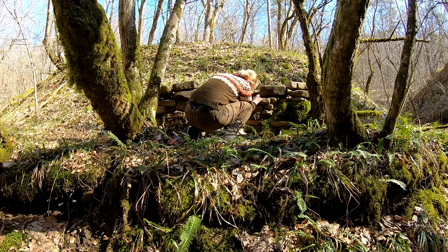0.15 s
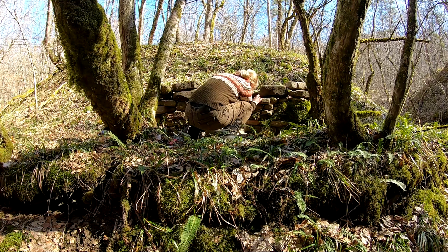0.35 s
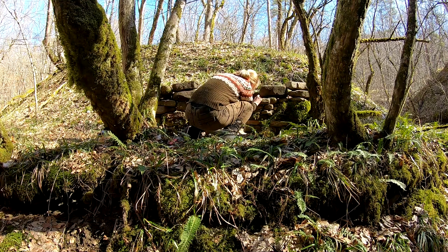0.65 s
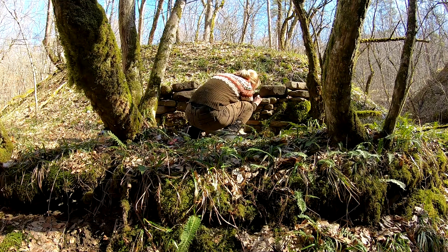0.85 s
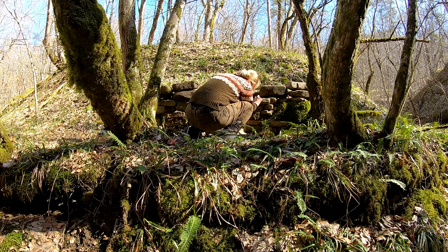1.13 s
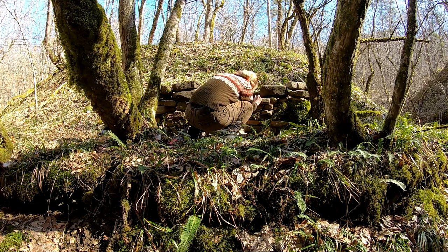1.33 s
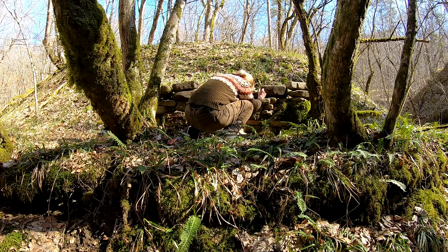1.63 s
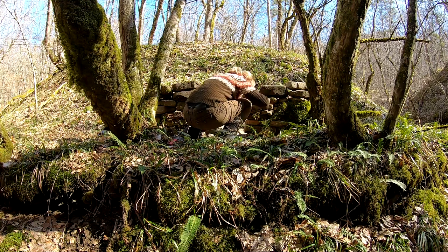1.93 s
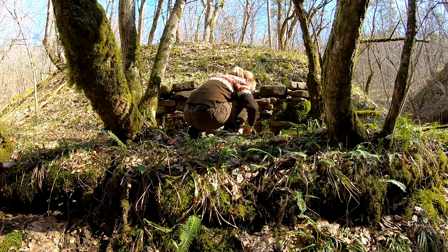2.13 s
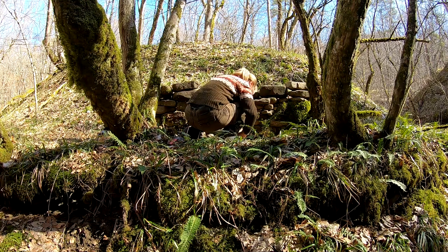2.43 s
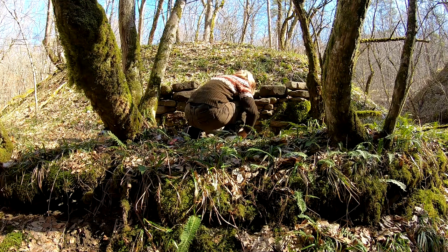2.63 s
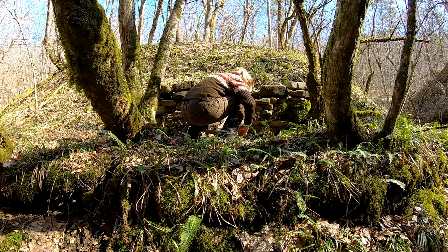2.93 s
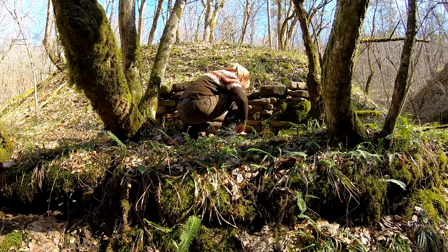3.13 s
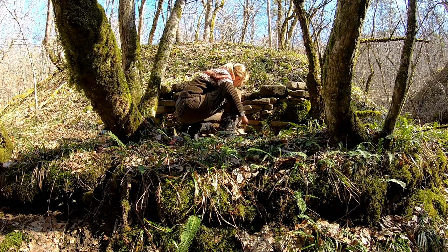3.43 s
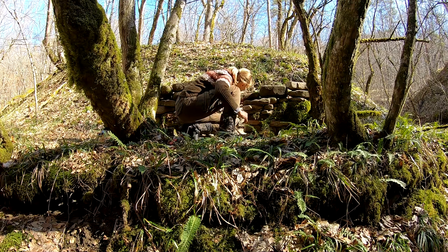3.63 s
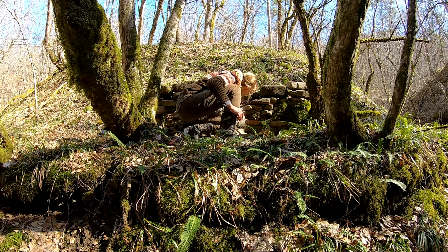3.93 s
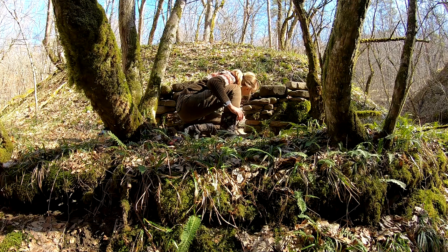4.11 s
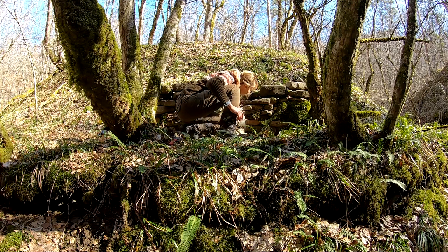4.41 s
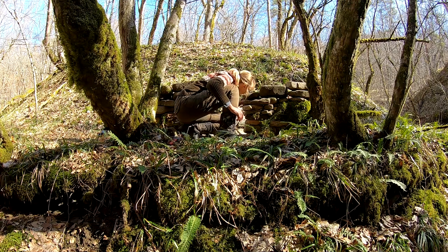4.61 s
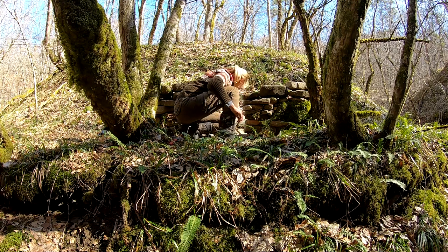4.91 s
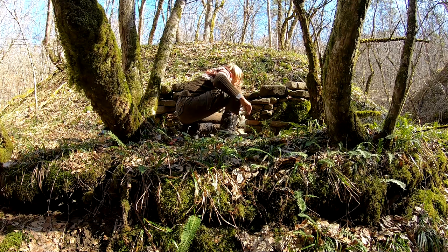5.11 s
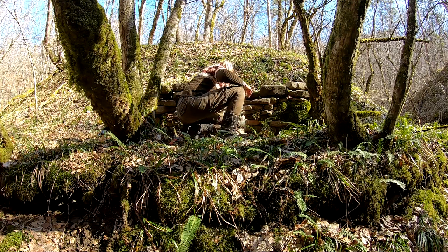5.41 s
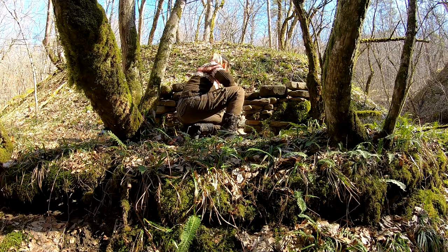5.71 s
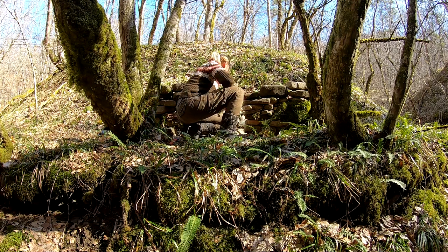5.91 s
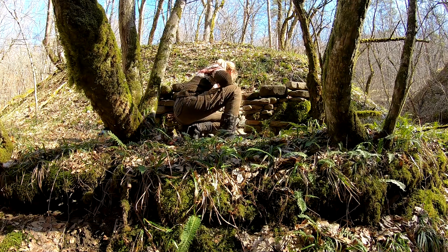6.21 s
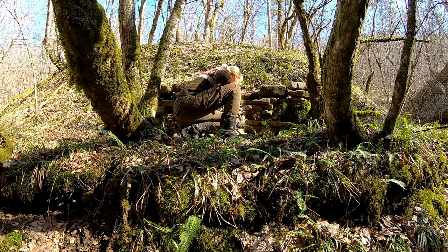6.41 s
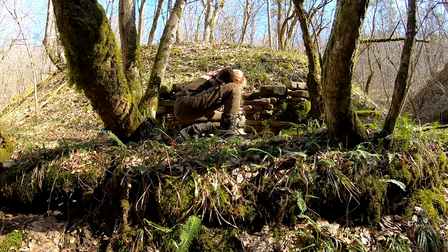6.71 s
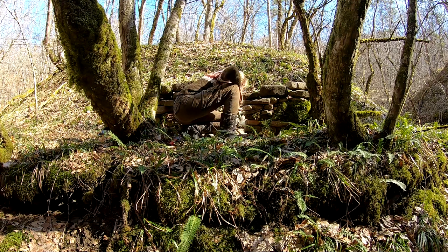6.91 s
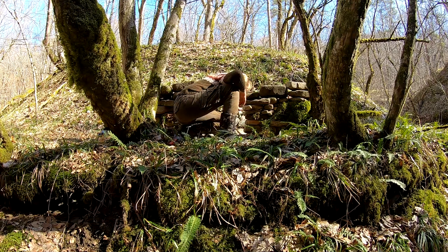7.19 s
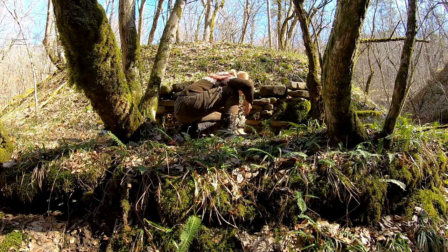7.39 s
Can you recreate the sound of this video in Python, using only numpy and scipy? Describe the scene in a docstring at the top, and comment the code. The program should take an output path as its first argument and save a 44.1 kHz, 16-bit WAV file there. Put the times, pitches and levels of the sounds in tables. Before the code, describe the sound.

Bright bubbling water drips steadily over a mossy bank while someone clicks stones together, rustles briefly, and gusts buffet the microphone.

```python
"""Forest spring with clicking stones

A spring trickles down a mossy bank: ringing bubbles plink in pools, and drops and droplets tick on leaves.
Someone clicks stones together (short chattering clicks) and shifts with a dry rustle and a dull scuff.
Shaped noise makes the wash and murmur of the stream, and gusts that buffet the two microphone ports.
A short forest echo follows the water and the stones."""
import sys
import numpy as np
from scipy import signal
from scipy.io import wavfile
from scipy.ndimage import uniform_filter1d

SR = 44100
rng = np.random.default_rng(int(sys.argv[2]) if len(sys.argv) > 2 else 0)


def persist_wave(psi):
    """Save psi, clipped to +-1, as 16-bit WAV."""
    counts = np.round(np.clip(psi, -1, 1) * 32767).astype(np.int16)
    wavfile.write(sys.argv[1], SR, np.atleast_2d(counts).T)


N = 332955
TIME = np.arange(N) / SR  # s

# In every table, a positive left-right value means louder on the left.
# loudest single bubbles: t/s, f/Hz, level/dB, ring time/cycles, left-right/dB
BUBBLES = [(0.03, 3610, -36.5, 10, -1), (0.093, 2540, -41, 7.4, 3), (0.119, 4550, -38, 1.5, 3),
           (0.141, 2060, -42, 11, -2), (0.154, 1180, -41, 4.6, 12), (0.142, 4000, -45, 7, 0),
           (0.16, 3830, -43, 3, 0), (0.196, 1600, -45.5, 5, 0), (0.218, 698, -49.5, 18.4, -7),
           (0.236, 1090, -45, 5.2, -12), (0.277, 2280, -37, 3.3, 2), (0.323, 3420, -40, 5, -6),
           (0.334, 1137, -46, 7.3, -12), (0.431, 1360, -45.5, 7.4, 4), (0.444, 2520, -37.5, 3.3, -1),
           (0.47, 2110, -37.5, 3.3, -1), (0.467, 1010, -48.5, 13, -7), (0.47, 1220, -47.5, 9.9, 10),
           (0.502, 1800, -44, 4, -4), (0.59, 2440, -40, 4.5, -2), (0.604, 3150, -38, 6.8, -2),
           (0.632, 1080, -45.5, 7.6, -19), (0.655, 3720, -35, 5.4, -4), (0.727, 1210, -46, 8, -2),
           (0.745, 2120, -42, 4, -6), (0.763, 1084, -42, 5.7, -11), (0.784, 3780, -39.5, 5.7, 1),
           (0.955, 2880, -38.5, 5, -2), (1.038, 670, -48.5, 6.9, -3), (1.104, 2580, -44, 12, 1),
           (1.136, 1240, -47, 7, -11), (1.241, 2670, -41, 8, 1), (1.266, 1370, -47, 8.1, 0),
           (1.271, 3050, -41, 14, -1), (1.29, 620, -51, 12.5, 2), (1.342, 1253, -46, 10.5, -4),
           (1.364, 600, -46.5, 5, 0), (1.388, 684, -46, 5.1, 0), (1.389, 1250, -39, 4.9, -9),
           (1.461, 1860, -39.5, 2.7, -9), (1.477, 2870, -37, 1.7, -5), (1.484, 590, -47, 5.5, 0),
           (1.515, 600, -48, 4.3, -3), (1.575, 1120, -47, 8.5, 5), (1.641, 3980, -38, 2.7, -2),
           (1.663, 2210, -41.5, 7.1, 2), (1.723, 1175, -46.5, 16, 11), (1.73, 4200, -38, 5.3, 0),
           (1.733, 2360, -37.5, 2.7, -1), (1.786, 686, -47, 8.1, 6), (1.814, 2900, -44, 5.5, -3),
           (1.89, 497, -56.5, 13, -2), (1.978, 3800, -40.5, 3, -2), (2.069, 1080, -35, 3.7, -27),
           (2.068, 634, -50.5, 6, -2), (2.08, 1290, -44.5, 6, -8), (2.088, 1670, -43, 6, -1),
           (2.165, 3000, -40.5, 7.5, 2), (2.216, 1630, -45, 8, -3), (2.292, 2540, -41.5, 6.6, -7),
           (2.348, 1400, -50, 7, -2), (2.386, 1680, -47, 11, -3), (2.465, 3700, -40.5, 4, 2),
           (2.501, 1440, -46.5, 6, 10), (2.64, 2180, -46, 9, 0), (2.67, 2490, -45, 8.2, -7),
           (2.697, 1024, -46.5, 7.8, -9), (2.752, 940, -49.5, 5.8, -1), (2.775, 1726, -40.5, 8.4, 3),
           (2.791, 1220, -46, 6.5, -9), (2.918, 645, -45.5, 5, 4), (3.03, 2680, -41.5, 5, -1),
           (3.052, 1056, -42.5, 10.6, 6), (3.141, 1055, -45, 6.5, -9), (3.142, 658, -50.5, 5.7, -2),
           (3.172, 995, -46, 7, -7), (3.387, 1230, -48, 7, 7), (3.471, 1250, -46, 6.1, -4),
           (3.472, 593, -50.5, 5.2, 2), (3.5204, 1454, -33.5, 3.8, -15), (3.53, 4180, -36.5, 3.4, -1),
           (3.542, 3300, -41.5, 7, -2), (3.611, 4040, -37, 3.3, -2), (3.647, 2820, -33, 4, 3),
           (3.666, 3900, -34, 2.5, -2), (3.682, 3726, -38.5, 3, -3), (3.741, 1760, -46, 11, 7),
           (3.779, 770.4, -46, 5.8, -11), (3.831, 4030, -41, 2.7, 3), (3.87, 2900, -39, 3, 4),
           (3.877, 1222, -49, 18, 0), (4.025, 3350, -42, 6.2, 0), (4.196, 2170, -37, 1.4, -5),
           (4.215, 2200, -40.5, 3, 1), (4.381, 3400, -41.5, 2, -2), (4.639, 3940, -36, 1.8, -4),
           (4.647, 3370, -41, 6, -5), (4.716, 1296, -46, 9.9, -3), (4.748, 4060, -38.5, 2.2, 3),
           (4.778, 650, -46.5, 14.5, -1), (4.807, 1330, -48, 7, -4), (4.846, 2850, -38, 3, -3),
           (4.911, 2100, -41, 3, 3), (5.027, 1280, -48, 7, 13), (5.052, 2540, -38.5, 3.8, -3),
           (5.082, 2550, -34, 7, -1), (5.107, 1755, -42, 16, -2), (5.19, 630, -44.5, 7.4, 0),
           (5.19, 1800, -45, 3.5, -4), (5.241, 3030, -32, 11.4, 0), (5.272, 4100, -34.5, 8.4, 2),
           (5.353, 4150, -38, 3, -4), (5.368, 1800, -41, 6.2, -1), (5.454, 3230, -35.5, 1.6, -8),
           (5.49, 1424, -41.5, 6.5, 0), (5.532, 1110, -49, 7.9, -15), (5.552, 1104, -45.5, 19, 12),
           (5.591, 2020, -34.5, 3.1, -5), (5.656, 1040, -44, 8.5, -8), (5.695, 2330, -45, 10, -2),
           (5.746, 2850, -42.5, 4.8, 0), (5.822, 1260, -46, 10.5, -3), (5.879, 720, -50.5, 7.2, 3),
           (5.9, 2990, -36, 4.3, -1), (5.937, 1053, -43.5, 8.1, -10), (6.032, 3080, -39, 8.2, -1),
           (6.106, 1570, -36, 1.4, -21), (6.127, 2680, -39, 8.7, -1), (6.134, 1810, -43, 3.6, 0),
           (6.21, 1580, -46.5, 9.9, 5), (6.298, 1320, -42.5, 5.1, 6), (6.356, 3510, -44.5, 10, -7),
           (6.403, 1256, -45.5, 6, 9), (6.418, 1700, -41, 2.6, 4), (6.425, 798, -49, 3.5, 0),
           (6.578, 1380, -40.5, 8.3, 6), (6.704, 2160, -43, 8, -2), (6.742, 628, -50, 4.6, 1),
           (6.776, 1700, -47, 17, 14), (6.87, 985, -50, 23, 6), (7.076, 912, -45.5, 8, -9),
           (7.264, 887, -45.5, 4.2, -1), (7.11, 3670, -36, 3.8, -12), (7.138, 2380, -45, 5, -6),
           (7.191, 744, -47, 2.5, 0), (7.175, 3220, -36.5, 5.4, 0), (7.276, 2570, -41, 8.5, -3),
           (7.377, 1950, -43.5, 9.5, 3), (7.426, 3920, -35, 3.3, -1), (7.485, 2110, -40, 5, 8),
           (7.52, 655, -50, 7, 0), (7.522, 1250, -47, 7, -4)]
# pools that keep releasing fainter bubbles:
# f/Hz, pitch spread/octaves, rate/(1/s), level/dB, ring time/cycles, left-right spread/dB
POOLS = [(640, 0.09, 11, -59.5, 6, -2.5), (1100, 0.3, 16, -57, 8.5, 7), (2200, 0.35, 22, -52.5, 7, 6),
         (3980, 0.2, 12, -50, 4.5, -0.5), (7200, 0.2, 12, -53, 7, 5)]
# loudest gulps, where tumbling water frees a knot of bubbles:
# t/s, length/s, centre f/Hz, level/dB (before a common lift)
GULPS = [(0.136, 0.029, 1600, -56.5), (0.26, 0.021, 1950, -53.5), (0.603, 0.029, 1490, -61),
         (0.726, 0.064, 1105, -61), (1.265, 0.076, 1450, -63), (1.454, 0.071, 1390, -58.5),
         (1.746, 0.076, 1480, -61), (1.769, 0.064, 925, -62), (1.862, 0.048, 3050, -60),
         (2.699, 0.083, 1180, -63.5), (3.053, .025, 1540, -53.5), (3.519, 0.0095, 1660, -56),
         (3.606, 0.025, 3700, -54.5), (4.79, 0.024, 985, -57), (4.87, 0.035, 1520, -54),
         (4.943, 0.022, 910, -58), (5.471, 0.032, 1510, -61.5), (5.56, 0.027, 1386, -54),
         (6.003, .02, 1700, -54.5), (6.348, 0.012, 2410, -57), (6.424, 0.013, 1060, -57.5),
         (6.705, .008, 2510, -51.5), (6.74, 0.054, 1250, -61.5), (7.17, 0.0069, 1930, -50.5),
         (7.183, 0.023, 2410, -52), (7.382, 0.034, 1990, -57.5), (7.48, 0.025, 1390, -57)]
# strength of the small bubbles by pitch: f/Hz, level/dB
FIZZ = [(520, -13.5), (650, -7.5), (850, -10.5), (1250, 1), (2000, 4.5), (3200, 6.5), (4300, 0.5),
        (5500, 3), (8300, 9.5), (9600, -3)]
# treble roll-off of the microphone, used on the small bubbles: f/Hz, level/dB
MIC_TOP = [(100, -1.5), (8800, 3), (10000, -0.5), (11200, -11), (15500, -31)]
# how far the flow lies above its usual level: t/s, level/dB
FLOW = [(0, 2), (0.25, 1), (0.72, 0), (1.02, 0), (1.4, 1), (1.8, 2.5), (2.35, 0), (2.85, 1), (3.4, 2),
        (3.78, 3), (4.05, 0), (4.55, 1), (4.8, 2), (5.1, 0.5), (5.75, 0), (6.05, 1), (6.5, 0), (7.55, 2)]
# how far the fine spray lies above its usual level: t/s, level/dB
SPRAY = [(0, -1.5), (0.72, -0.5), (0.95, -3.5), (1.8, 1.5), (2.15, 0), (2.39, -4), (2.55, 4), (2.73, -3),
         (3.1, 4), (3.65, 1.5), (4.35, -1), (4.7, 4), (5.05, -0.5), (5.45, 0.5), (6.13, -2.5), (6.3, -4.5),
         (6.55, -0.5), (7.55, 1)]
# loudest drops on wet stone and leaves: t/s, level/dB, left-right/dB, ring of the struck spot f/Hz
DROPS = [(0.008, -40, -2, 4700), (0.1885, -41, -10, 8100), (0.269, -34, 1, 7900), (0.324, -38.5, -1, 4130),
         (0.502, -39, -6, 4300), (0.556, -39, -9, 8060), (0.695, -38.5, -3, 6300),
         (0.8117, -38.5, -5, 6100), (1.155, -41.5, 1, 4820), (1.241, -42, 0, 8060), (1.325, -41, -2, 6950),
         (1.756, -37, 0, 8880), (2.509, -32.5, -14, 4700), (2.647, -44, -5, 4720), (2.844, -36, -1, 5200),
         (3.005, -42, 6, 5760), (3.06, -40, -5, 7350), (3.2166, -32, -0.5, 6400), (3.272, -37, 0, 2900),
         (4.04, -38.5, -1, 8560), (4.095, -39, 2, 4700), (4.329, -40.5, -5, 8600), (4.521, -36, -1, 4590),
         (4.681, -40, -2, 4510), (4.777, -36.5, -8, 8240), (4.956, -35.5, -4, 6650),
         (5.018, -37.5, -5, 7860), (5.072, -39, 0, 6780), (5.195, -41, -7, 8300), (5.722, -36, -9, 8640),
         (5.899, -38, -4, 6840), (6.105, -34.5, -6, 5200), (6.139, -37, -6, 4000), (6.354, -43, -7, 3700),
         (6.4765, -32, -7, 8340), (6.631, -42, -7, 8910), (6.877, -37, -3, 5600), (7.215, -36.5, -8, 8460),
         (7.249, -39, -4, 6510), (7.2715, -37.5, -8, 8000), (7.35, -34.5, -1, 5100)]
# spectrum of a smacking drop: f/Hz, level/dB
SMACK = [(400, -19.5), (1500, -9), (4000, -1), (6000, -3.5), (8300, 0), (9800, -8), (11200, -26),
         (15000, -29)]
# spectrum of a droplet on a leaf: f/Hz, level/dB
TICK = [(700, -24), (2000, -6), (4200, -0.5), (6000, -1), (8500, -1.5), (9800, -9), (11200, -23),
        (15000, -38)]
# stone knocking on stone, first contact: t/s, level/dB
KNOCKS = [(2.1992, -19.5), (3.647, -33.5), (3.8698, -29), (3.909, -32.5)]
# spectrum of a stone click: f/Hz, level/dB
STONE = [(300, -43), (1400, -4), (2700, -6), (4200, 12.5), (6500, 11), (9000, 8.5), (11000, -20),
         (15000, -23)]
# clothes and dry leaves sliding as the person shifts: t/s, length/s, level/dB
SLIDES = [(3.198, 0.062, -49.5), (3.311, 0.032, -50), (3.388, 0.022, -55.5), (3.1, 0.035, -65)]
# spectrum of the rustle: f/Hz, level/dB
RUSTLE = [(100, -41), (200, -3), (450, -9.5), (700, -3), (1500, 1.5), (3000, 2), (5000, -1.5), (8500, -4),
          (11000, -14), (15000, -23)]
# spectrum of the scuff on the soil: f/Hz, level/dB
SOIL = [(70, -24), (170, 5), (290, -10), (450, -15.5), (900, -6), (2500, -56)]
# spectrum of the stream's wash: f/Hz, level/dB
WASH = [(220, -73), (380, -11), (518, -34), (644, 4.5), (906, -4), (1240, -0.5), (2190, -2), (2950, -5.5),
        (3180, -4), (5400, -13), (8730, -9), (9580, -14), (11200, -27.5), (12300, -29), (15500, -45)]
# spectrum of the stream's low murmur: f/Hz, level/dB
MURMUR = [(20, -22), (85, -9), (120, -22), (155, 3.5), (200, -2), (250, -7.5), (400, -14), (600, -14.5),
          (1200, -62)]
# left-right likeness of the wash and murmur: f/Hz, coherence/1
LIKENESS = [(60, -0.74), (200, -0.34), (640, -0.2), (1400, 0.046), (3000, 0.96), (4500, 0.84),
            (7000, -0.53), (15000, -0.093)]
# gusts on the microphone: t/s, length/s, level/dB, left-right/dB
GUSTS = [(0.565, 0.081, -41, 0), (1.733, 0.091, -45.5, -6), (3.977, 0.033, -41, -10),
         (4.156, 0.023, -38, 13), (4.271, 0.033, -45, -16), (4.849, 0.081, -28.5, -3.5),
         (5.006, 0.1, -30.5, 2.5), (5.259, 0.11, -35.5, 5.5), (5.454, 0.054, -30.5, 1),
         (5.684, 0.13, -39, -6.5), (5.892, 0.03, -31, 8), (6.044, 0.13, -32, -2.5), (6.3, 0.084, -32, 5),
         (6.55, 0.12, -45.5, 1), (6.8, 0.081, -48, -8), (7.112, 0.27, -38, 5.5), (7.546, 0.039, -37, 17)]
# the breeze between gusts: t/s, level/dB
BREEZE = [(0, -65), (0.3, -69), (0.62, -53), (0.9, -68), (1.5, -68), (1.9, -55.5), (2.4, -71), (3.8, -76),
          (4.25, -52), (4.6, -64.5), (5.1, -51.5), (7.55, -52)]
# sharp wind thumps, mostly stronger on one port: t/s, level/dB, f/Hz, left-right/dB
BUFFETS = [(1.755, -51, 67.5, -10), (4.899, -29, 55, -16), (4.911, -52, 132, -10), (5.074, -53, 104, 7),
           (5.501, -43.5, 71, -5), (5.802, -29, 104, 31), (5.817, -31, 62, 22), (6.081, -40.5, 71, -5),
           (6.361, -33, 60, 16), (7.329, -25.5, 46.3, 33)]

POOL_SPREAD_DB, POOL_SIDE_DB = 1.5, 1
POOL_FLOW_SHARE = 1.03  # share of the flow's swell that the pools follow
BUBBLE_RISE = 0.015  # average bend; the pitch gains twice this share in one ring time
SLOSH_S, SLOSH_DB, SPRAY_SLOSH_DB = 0.06, 0.56, 0.4  # parts of the trickle also swell on their own
GLUGS_PER_S, GLUG_S, GLUG_DB = 6.5, 0.016, 2  # pace, time to sink back, lift over the water between glugs
DRIPS_PER_S, DRIP_DB, DRIP_SPREAD_DB, DRIP_SIDE_DB = 4, -45.5, 1.8, -4
DROP_RING_DB, RING_OCTAVES = 9.5, 0.2  # how far a struck spot's ring stands out; width of drop and leaf rings
TICKS_PER_S, TICK_SPREAD_DB, TICK_SIDE_DB = 70, 3.5, -4
TICK_DB, TICK_SPRAY_SHARE, TICK_CLUMP_DB = -67.3, 1.2, 3
LEAF_HZ, LEAF_RING_DB = (2300, 9000), 11.5  # range of leaf pitches, and how far their rings stand out
REBOUND_S, REBOUND_DB = 0.0021, -8  # time between stone contacts; drop from the first to the second
SLIDE_ATTACK_S, SLIDE_RELEASE_S = 0.037, 0.027
CRACKLES_PER_S, CRACKLE_DB, CRACKLE_SPREAD_DB = 1400, -5, 2.2
SCRATCH_DB = 1.1  # how unevenly the cloth catches
SCUFF_S, SCUFF_LENGTH_S, SCUFF_DB = 7.175, 0.028, -53.5
MURMUR_DB = -65.5
GUST_ATTACK_S, GUST_RELEASE_S = 0.016, 0.028
SMALL_EDDY_DB, STRONG_GUST_DB = -46.5, -29  # level of small eddies in a gust of this strength
SMALL_EDDY_GROWTH = 4  # dB that small eddies gain per dB of gust
FOREST_T60 = 0.15  # s for the echo to fall by 60 dB
EDGE_HZ = 15600


def plinks():
    """Loud single bubbles, and the fainter ones that every pool releases around its own pitch."""
    out = np.zeros((2, N))
    for s, *row in BUBBLES:
        add(out, s, plink(*row))
    for hz, octaves, per_s, db, cycles, side_db in POOLS:
        times = loose_times(per_s, size=250)
        chances = np.clip(rng.standard_normal((len(times), 4)), -2, 2)
        for s, (pitch, strength, ring, side) in zip(times, chances):
            bubble_hz = hz * 2 ** (octaves * pitch)
            level_db = db + POOL_SPREAD_DB * strength + POOL_FLOW_SHARE * curve(FLOW, s)
            bubble_side_db = POOL_SIDE_DB + side_db * side
            add(out, s, plink(bubble_hz, level_db, cycles * np.exp(0.43 * ring), bubble_side_db))
    return out


def plink(hz, db, cycles, side):
    """One clear bubble with its own glide and its own reflections from the hollow it sits in."""
    path = amp(-9.5) * scatter(decay=0.0068)
    path[:, :1] += panned(side)
    ringing_bubble = bubble(hz, cycles, rise=BUBBLE_RISE * 2 * rng.random())
    return amp(db) * signal.fftconvolve(ringing_bubble[None], path, axes=1)


def bubble(hz, cycles, rise=.015, onset_cycles=2.0):
    """A trapped bubble rings down; its pitch rises as it nears the surface."""
    ring = cycles / hz
    t = np.arange(0, 6 * ring, 1 / SR)
    shape = np.exp(-t / ring) * (1 - np.exp(-t * hz / onset_cycles))
    return shape / shape.max() * np.sin(2 * np.pi * hz * (t + rise * t * t / ring))


def gulps(count=14):
    """Each tumble of water frees a quick run of damped bubbles around one pitch."""
    out = np.zeros((2, N))
    for s, length, hz, db in GULPS:
        knot = np.zeros((2, SR // 5))
        chances = rng.uniform(-0.997, 1, (count, 4))
        for k, (delay, octaves, size_db, side) in enumerate(chances):
            sound = bubble(hz * 2 ** (0.785 * octaves), 4.9, rise=0.038, onset_cycles=0.55)
            start = length * (k + .5 * delay + .5) / count
            add(knot, start, amp(5.5 * size_db) * panned(6 * side) * sound)
        loudness = np.sqrt(np.sum(knot ** 2) / (2 * length * SR))
        add(out, s, amp(db + 3.5) * knot / loudness)
    return out


def babble():
    """Middling bubbles, a crowd of them, in the pools straight ahead."""
    return amp(-58) * swarm(572.0, 4800, 3000, spread_db=11.0, cycles=7.16, side_db=0.5, echo_db=-4.5)


def spray():
    """Fine droplets and the tiniest bubbles tick as short rings, mostly to the right."""
    swell_db = 1.2 * curve(SPRAY, TIME) + SPRAY_SLOSH_DB * slosh(TIME)
    crowd = swarm(4980, 8900, 2400, spread_db=14.5, cycles=2.7, side_db=-8.0, echo_db=0.0)
    return amp(-67.0 + swell_db) * crowd


def swarm(low_hz, high_hz, total, spread_db, cycles, side_db, echo_db, count=120):
    """Crowds of small bubbles of many sizes burst in clumps at many spots along the trickle."""
    out, pitches = np.zeros((2, N)), np.geomspace(low_hz, high_hz, count)
    slow = np.arange(0, N / SR, .005)
    clumps = unit(uniform_filter1d(rng.standard_normal(len(slow)), size=5))
    for hz, flow_db in zip(pitches, surge(slow, pitches).T):
        level_db = read(FIZZ, hz) + flow_db + 2.34 * clumps
        for place, strength, ring, side, detune in rng.random((total // count, 5)):
            s = place * N / SR
            db = np.interp(s, slow, level_db) + spread_db * strength ** 2
            bubble_hz = hz * (0.9584 + 0.037 * detune)
            sound = bubble(bubble_hz, cycles * (0.23 + ring ** 2), rise=0.035, onset_cycles=0.55)
            add(out, s, amp(db) * panned(side_db + 13 * (side - .5)) * sound)
    echo = signal.oaconvolve(out, scatter(decay=0.007), axes=1)[:, :N]
    return unit(colour(out + amp(echo_db) * echo, MIC_TOP))


def surge(t, hz):
    """Swell in dB by time and pitch: low and middle pitches follow the flow, the treble the spray."""
    swing = np.array([curve(rows, t) + SLOSH_DB * slosh(t) for rows in (FLOW, FLOW, SPRAY)])
    centres = np.log([900, 2700, 7000])  # Hz, gurgle, splash and treble
    shares = np.array([np.interp(np.log(hz + 1), centres, row) for row in np.eye(3)])
    return swing.T @ shares


def slosh(t):
    """A slow random swing at the times t, drawn from steps of rms 1 joined by straight lines."""
    steps = rng.standard_normal(200)
    return np.interp(t / SLOSH_S, np.arange(len(steps)), steps)


def glugs():
    """The fall gathers and lets go: a gain of rms 1 that jumps with every glug and sinks back."""
    starts = loose_times(GLUGS_PER_S, size=70) - 1 / GLUGS_PER_S
    since = TIME - starts[np.searchsorted(starts, TIME) - 1]
    return unit(amp(GLUG_DB * np.exp(-since / GLUG_S)))


def loose_times(per_s, size=80):
    """Water gathers and lets go at a loose pace: one random moment in every period."""
    return (np.arange(size) + rng.random(size)) / per_s


def drips():
    """Single drops smack close by, each with the ring of the spot it hits, with lighter ones added."""
    out, times = np.zeros((2, N)), loose_times(DRIPS_PER_S, size=40)
    light = []
    for s, (strength, side, pitch) in zip(times, rng.standard_normal((len(times), 3))):
        db = DRIP_DB + DRIP_SPREAD_DB * strength
        light.append((s, db, DRIP_SIDE_DB + 4 * side, 4800 * 2 ** (.5 * pitch)))
    for s, db, side, hz in DROPS + light:
        spot = ringing(SMACK, hz, DROP_RING_DB, RING_OCTAVES)
        add(out, s, impact(db, side, spot, splash_db=6, decay=0.0024))
    return out


def ticks(count=12):
    """Pinpoint droplets land in clumps on leaves, each a dry tick with the ring of its leaf."""
    out, clumps = np.zeros((2, N)), amp(TICK_CLUMP_DB * slosh(TIME))
    for hz in np.geomspace(*LEAF_HZ, count):
        leaf = ringing(TICK, hz, LEAF_RING_DB, RING_OCTAVES)
        tick = impact(0, 0, leaf, splash_db=2.0, decay=0.0014)
        for place, size, side in rng.random((round(TICKS_PER_S * N / SR / count), 3)):
            db = TICK_SPREAD_DB * min(-np.log(size), 4)  # many small, a few large
            add(out, place * N / SR, amp(db) * panned(TICK_SIDE_DB + 14 * (side - .5)) * tick)
    return amp(TICK_DB + TICK_SPRAY_SHARE * curve(SPRAY, TIME)) * unit(out * clumps)


def ringing(spectrum, hz, ring_db, octaves):
    """A spectrum table with one resonance raised out of it."""
    f = np.geomspace(200, 16000, 120)
    peak = np.exp(-(np.log2(f / hz) / octaves) ** 2)
    return np.transpose([f, read(spectrum, f) + ring_db * peak])


def impact(db, side, spectrum, splash_db, decay):
    """A sharp click together with a short burst of fragments and reflections."""
    hit = amp(splash_db) * scatter(decay)
    hit[:, :1] += 1
    hit = colour(hit, spectrum)
    return amp(db) * panned(side) * hit / abs(hit).max()


def stones(count=4):
    """Dry clicks of stone that hardly ring but chatter as they settle, each contact weaker."""
    out = np.zeros((2, N))
    for s, db in KNOCKS:
        for k in range(count):
            contact_db = db + REBOUND_DB * k ** 0.47
            add(out, s + k * REBOUND_S, impact(contact_db, 0, STONE, splash_db=-0.3, decay=0.0069))
    return out


def rustle():
    """Slides of cloth that catch and slip, with dry leaves crackling in them."""
    likeness = [(300, 0.39), (1400, 0.54), (3000, 1.0), (7000, 0.63)]  # f/Hz, coherence/1
    cloth = noise(RUSTLE, likeness, patchy_db=-0.5, flicker_db=-0.6)
    snaps = unit(colour(clicks(CRACKLES_PER_S, CRACKLE_SPREAD_DB, 0), RUSTLE))
    catching = amp(SCRATCH_DB * unit(uniform_filter1d(rng.standard_normal(N), size=200)))
    grain = cloth * catching + amp(CRACKLE_DB) * snaps
    slides = [amp(db) * swell(s, length, SLIDE_ATTACK_S, SLIDE_RELEASE_S) for s, length, db in SLIDES]
    return grain * sum(slides)


def clicks(per_s, spread_db, side_db):
    """Random stereo impulses: many small ones, a few large."""
    happens = rng.random(N) < per_s / SR
    sizes = amp(spread_db * np.minimum(rng.exponential(1, N), 4)) * happens
    return sizes * rng.choice([-1, 1], N) * panned(side_db + 4 * rng.standard_normal(N))


def scuff():
    """Something heavy drags briefly over the soil, as a short swell of dull noise."""
    rasp = unit(colour(rng.standard_normal((2, N)), SOIL))
    return amp(SCUFF_DB) * rasp * swell(SCUFF_S, SCUFF_LENGTH_S, attack=0.013, release=0.058)


def wash(pulse):
    """The many blurred splashes of the stream, as noise that swells with flow, spray and glugs."""
    return amp(-55.0) * pulse * noise(WASH, LIKENESS, patchy_db=3.5, flicker_db=1.7, level=surge)


def murmur():
    """The low voice of the stream, as noise that follows half of the flow's swell in dB."""
    deep = noise(MURMUR, LIKENESS, patchy_db=2.0, flicker_db=1.5, size=2048)
    return amp(MURMUR_DB + .5 * curve(FLOW, TIME)) * deep


def wind():
    """Eddies thump each port almost separately; small, quick ones grow faster with the gust than large."""
    gusts = [amp(db) * panned(side) * swell(s, length, GUST_ATTACK_S, GUST_RELEASE_S)
             for s, length, db, side in GUSTS]
    power = amp(curve(BREEZE, TIME)) ** 2 + sum(gust ** 2 for gust in gusts)
    gust_db = 10 * np.log10(power)
    apart = [(20, -0.024), (200, 0)]  # f/Hz, coherence/1
    # eddy spectra: f/Hz, level/dB
    large_spectrum = [(8, -20.0), (22, 10.0), (42, 0.0), (60, -25.0), (90, -30), (200, -61), (1500, -120)]
    small_spectrum = [(20, -13), (60, -3.0), (100, -14), (160, -29), (260, -53), (1500, -110)]
    large = noise(large_spectrum, apart, patchy_db=1.5, flicker_db=-2.0, size=2048)
    # even out the large eddies so that the gust sets their strength
    large = large / np.sqrt(uniform_filter1d(large ** 2, size=3000, axis=1) + 0.033)
    small = noise(small_spectrum, apart, patchy_db=1.5, flicker_db=-3.0, size=2048)
    small_db = SMALL_EDDY_DB + SMALL_EDDY_GROWTH * (gust_db - STRONG_GUST_DB)
    out = large * amp(gust_db - 4.5) + small * amp(small_db)
    t = np.arange(-.06, .06, 1 / SR)
    for s, db, hz, side in BUFFETS:
        thump = np.exp(-(t * hz / 0.44) ** 2) * np.sin(2 * np.pi * hz * t)
        add(out, s + t[0], amp(db) * panned(side) * thump)
    return out


def forest(x, size=13000):
    """A thin, short echo from trunks and slope, made of sparse random reflections."""
    t = np.arange(size) / SR
    sparse = rng.standard_normal((2, size)) * (rng.random((2, size)) < .05)
    taps = sparse * amp(-60 * t / FOREST_T60) * (t > .006)
    return signal.oaconvolve(x, taps / np.linalg.norm(taps, axis=1, keepdims=True), axes=1)[:, :N]


def scatter(decay, size=1500):
    """Dense early reflections off the bank, different at each port, of unit energy."""
    t = np.arange(size) / SR
    taps = rng.standard_normal((2, size)) * np.exp(-t / decay) * (t > .0008)
    return taps / np.linalg.norm(taps, axis=1, keepdims=True)


def noise(points, likeness, patchy_db, flicker_db, level=None, size=512):
    """Stereo noise with a spectrum, drifting patches, shared flicker and an optional level field."""
    hop = size // 4
    t, hz = np.arange(N // hop + 5) * hop / SR, np.fft.rfftfreq(size, 1 / SR)
    a, b, c, d, patches = rng.standard_normal((5, len(t), len(hz)))
    patches = unit(uniform_filter1d(uniform_filter1d(patches, size=6, axis=0), size=7, axis=1))
    flicker = unit(uniform_filter1d(rng.standard_normal(len(t)), size=4))[:, None]
    same, left = np.clip(read(likeness, hz), -1, 1), a + 1j * b
    right = same * left + np.sqrt(1 - same ** 2) * (c + 1j * d)
    level_db = read(points, hz) + patchy_db * patches + flicker_db * flicker
    if level:
        level_db = level_db + level(t, hz)
    z = np.array([left, right]) * amp(level_db)
    sound = signal.istft(z, nperseg=size, noverlap=size - hop, time_axis=1, freq_axis=2)[1]
    return unit(sound[:, :N])


def colour(x, points, size=1024):
    """Causal filter of unit energy with the given spectrum."""
    log_gain = np.log(amp(read(points, abs(np.fft.fftfreq(size, 1 / SR)))))
    # the Hilbert transform gives the phase that puts the energy first
    taps = np.fft.ifft(np.exp(np.conj(signal.hilbert(log_gain)))).real
    return signal.oaconvolve(x, taps[None] / np.linalg.norm(taps), axes=1)[:, :x.shape[1]]


def swell(start, length, attack, release):
    """An envelope that grows into its start, holds for its length and dies away."""
    before = np.minimum(TIME - start, 0)
    after = np.maximum(TIME - start - length, 0)
    return np.exp(before / attack - after / release)


def amp(db):
    """Decibels to gain."""
    return 10 ** (np.asarray(db) / 20)


def unit(x):
    """Scales to rms 1."""
    return x / np.sqrt(np.mean(x ** 2) + 1e-20)


def read(points, hz):
    """Reads a table by pitch on a log-frequency axis."""
    f, value = np.transpose(points)
    return np.interp(np.log(hz + 1), np.log(f + 1), value)


def curve(rows, t):
    """Reads a table by time at the times t."""
    rows = np.array(rows)
    return np.interp(t, rows[:, 0], rows[:, 1])


def panned(db):
    """Left and right gains for a level difference; their mean power is 1."""
    gains = amp(np.array([db, -db]).reshape(2, -1) / 2)
    return gains / np.sqrt((gains ** 2).mean(0))


def add(mix, s, sound):
    """Adds a sound to the stereo mix at time s."""
    part = mix[:, max(round(s * SR), 0):][:, :sound.shape[1]]
    part += sound[:, :part.shape[1]]


def scene():
    """Near water and stones with their echo, over the stream, the person's movements and the wind."""
    pulse = glugs()
    water = plinks() + gulps() + pulse * (babble() + spray()) + drips() + ticks()
    near = water + stones()
    stream = wash(pulse) + murmur()
    return near + amp(-9.5) * forest(near) + rustle() + scuff() + stream + wind()


def record(dry):
    """The recorder's band limit: a steep low-pass filter."""
    taps = signal.firwin(511, EDGE_HZ, window=("kaiser", 9), fs=SR)
    return signal.oaconvolve(dry, taps[None], "same")


dry = scene()
out = record(dry)
persist_wave(out)
```